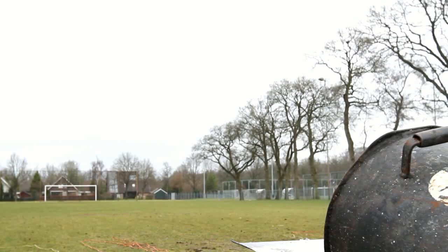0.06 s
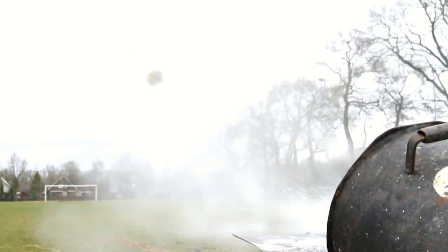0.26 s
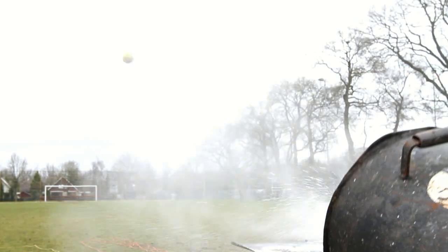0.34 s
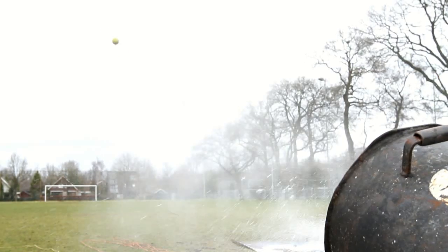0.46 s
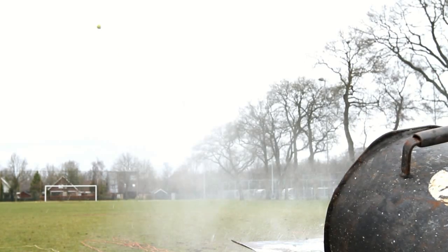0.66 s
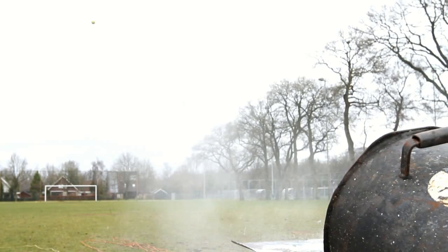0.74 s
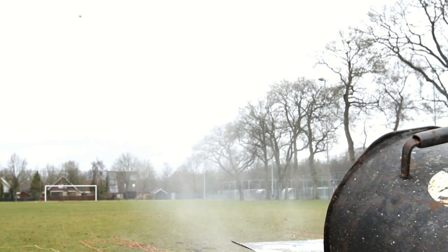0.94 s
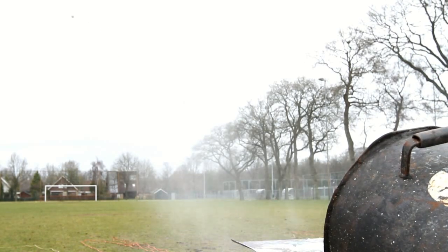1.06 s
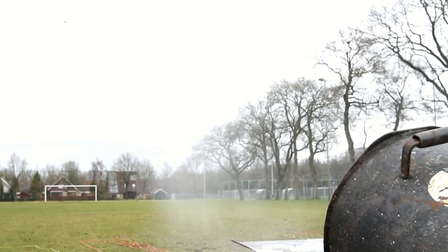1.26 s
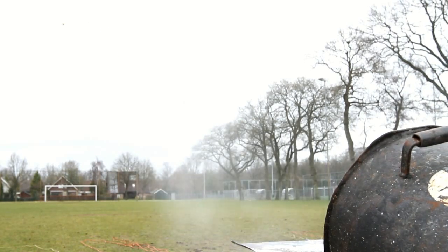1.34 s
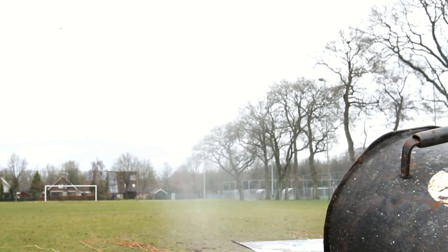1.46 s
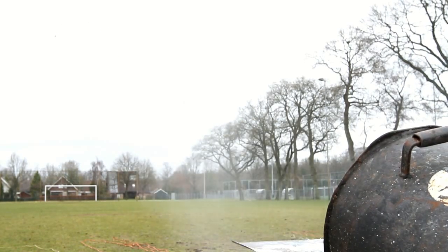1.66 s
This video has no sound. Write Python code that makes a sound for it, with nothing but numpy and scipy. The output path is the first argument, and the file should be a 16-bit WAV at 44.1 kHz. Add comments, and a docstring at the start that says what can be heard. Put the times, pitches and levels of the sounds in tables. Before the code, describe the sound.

A carbide cannon fires close by at about 0.2 seconds, breaking the quiet of an open field with a sharp, overloaded crack and a deep boom. Quick reflections slap back from trees between 0.4 and 0.9 seconds as the shot spreads into a rolling rumble that grows duller. At about 1.4 seconds one clear, quieter echo returns from distant houses, and the faint rumble keeps fading.

```python
"""Carbide cannon on an open field

The crack of the muzzle blast overloads the recorder, and the boom of the barrel swells just behind it.
Trees scatter both into a long roll, while single trunks and fences reflect a few distinct slaps.
Over a second later, distant house fronts return one clear echo."""
import sys
import numpy as np
from scipy import signal
from scipy.fft import rfft, irfft
from scipy.io import wavfile

SR = 44100
rng = np.random.default_rng(int(sys.argv[2]) if len(sys.argv) > 2 else 0)


def dump_mix(stems):
    """Bounce the given channels to the path in sys.argv[1] as a 16-bit WAV at rate SR."""
    frames = np.atleast_2d(stems).T  # one column per channel
    limited = np.clip(frames, -1, 1)  # hard clip at full scale
    pcm = np.round(limited * 32767).astype(np.int16)
    wavfile.write(sys.argv[1], SR, pcm)


N = 74970
FIRE_S, BLAST_RISE_S = 0.2268, 0.004

# octave bands of the muzzle blast (frequency [Hz], level [dB], T60 [s])
CRACK_BANDS = [(31, -39, 0.24), (63, -41, 0.2), (125, -32, 0.1), (250, -21.5, 0.1), (516, -7, 0.1),
               (986, 3.5, 0.07), (2050, 6.5, 0.066), (4020, 8, 0.05), (7800, 2.5, 0.05),
               (15100, -14.5, 0.05)]
def crack(hold_s=0.009):
    """Blast wave: gas expanding suddenly from the muzzle radiates a brief broadband burst."""
    gas = noise(coherence=0.15)
    bands = sum(undb(db) * octave(gas, hz) * fade(FIRE_S + hold_s, t60) for hz, db, t60 in CRACK_BANDS)
    return rise(FIRE_S, BLAST_RISE_S) * bands


# octave bands of the outflow (frequency [Hz], level [dB], peak after the shot [s], half width [s])
BOOM_BANDS = [(31, -39.5, 0.045, 0.025), (63, -26, 0.045, 0.014), (119.6, -11, 0.064, 0.012),
              (250, -17, 0.035, 0.024), (470, -10, 0.028, 0.015)]
def boom():
    """Volume source: the barrel empties in one swell, whose pitch sinks as the lows peak later."""
    gas, age, out = noise(coherence=0.25), since(FIRE_S), 0
    for hz, db, peak_s, width_s in BOOM_BANDS:
        swell = np.exp(-0.5 * ((age - peak_s) / width_s) ** 2) * rise(FIRE_S, BLAST_RISE_S)
        band = octave(gas, hz) * swell
        out += undb(db) * band * np.sqrt(np.mean(swell ** 2) / np.mean(band ** 2))
    return out


# modes of the air in the barrel (frequency [Hz], level [dB], T60 [s])
BARREL_MODES = [(104.6, -15.5, 0.3), (144.7, -16.5, 0.27), (278, -24.5, 0.2), (352.3, -16, 0.25),
                (371.8, -20.5, 0.56)]
def barrel(swell_s=0.05):
    """Air-column resonance: damped modes build up with the boom and die quickly."""
    modes = 0
    for hz, db, t60 in BARREL_MODES:
        cycles = hz * since(FIRE_S) + rng.random()
        modes += undb(db) * np.sin(2 * np.pi * cycles) * fade(FIRE_S + swell_s, t60)
    return rise(FIRE_S, swell_s) ** 2 * modes


# octave bands of the scatter from nearby ground and trees (frequency [Hz], level [dB], T60 [s])
TREE_BANDS = [(31, -61, 0.6), (61.6, -44, 0.67), (132, -22.5, 0.9), (269.7, -12, 0.67), (500, -14.5, 0.75),
              (1050, -9.5, 0.48), (2010, -9.5, 0.39), (4300, -8, 0.3), (7650, -17.5, 0.3),
              (15000, -29, 0.3)]
def trees(rise_s=0.033):
    """Multiple scattering: trunks and branches spread the shot into a roll that dulls as it fades."""
    arrivals = noise(coherence=0.1, grain_db=2)
    bands = sum(undb(db) * octave(arrivals, hz) * fade(FIRE_S, t60) for hz, db, t60 in TREE_BANDS)
    return rise(FIRE_S, rise_s) * bands


# reflections from trunks and fences (time [s], level [dB], left minus right [dB])
SLAP_ARRIVALS = [(0.3998, -23, 25), (0.4035, -21, 45.5), (0.4265, -7, -15.5), (0.456, -10, -19),
                 (0.463, -11, -13), (0.522, -15.5, -7), (0.527, -6.5, 5), (0.676, -20.5, 1),
                 (0.88, -25.5, 0), (0.92, -28.5, -14)]
# spectrum of a slap (frequency [Hz], relative level [dB])
SLAP_SPECTRUM = [(30, -23), (70, -11), (150, 7.5), (400, 1), (1000, -6.5), (4000, -19.5), (8000, -25),
                 (15000, -67)]
def slaps(cutoff_hz=3000, dulling_s=1):
    """Early reflections: single surfaces return the shot, and air absorption dulls the later ones."""
    bright = reflections(SLAP_ARRIVALS, SLAP_SPECTRUM, scatter_db=-0.5, t60=0.057, coherence=0.3)
    dull = signal.filtfilt(*signal.butter(1, cutoff_hz, fs=SR), bright)
    return bright + rise(FIRE_S, dulling_s) * (dull - bright)


# reflections from distant house fronts (time [s], level [dB], left minus right [dB])
ECHO_ARRIVALS = [(1.3583, -13, 3), (1.4047, -32, 7), (1.4298, -35.5, 1)]
# spectrum of an echo, its treble absorbed by the air (frequency [Hz], relative level [dB])
ECHO_SPECTRUM = [(30, -19), (65, -3), (140, 13.5), (280, 4.5), (500, 8.5), (800, -1), (1300, 5),
                 (2200, 5.5), (4000, -10), (6600, -30.5), (11000, -54.5)]
def house_echoes():
    """Specular reflection: flat house fronts return one strong echo and two faint ones."""
    return reflections(ECHO_ARRIVALS, ECHO_SPECTRUM, scatter_db=-2.5, t60=0.035, coherence=0.88)


def echo_ring(hz=460, width_hz=260, db=-36, rise_s=0.014, t60=0.11):
    """Damped resonance: a hollow band of noise hangs on briefly after the strongest echo."""
    start = ECHO_ARRIVALS[0][0]
    tone = resonance(resonance(noise(coherence=1), hz, width_hz), hz, width_hz)
    return undb(db) * tone / tone.std() * rise(start, rise_s) * fade(start, t60)


# returns from groves (time [s], relative level [dB], T60 [s], left minus right [dB], coherence [0-1])
GROVE_ARRIVALS = [(0.387, -0.5, 1, 0, 0.24), (0.507, -4.5, 0.23, 0, 1), (0.599, -9.5, 1.0, 2, 0.56),
                  (0.975, -21, 0.62, -9, 0.24), (1.21, -23.5, 0.33, -3, 0.5), (1.284, -18, 0.27, -2, 0.94)]
# octave bands of those returns (frequency [Hz], relative level [dB], loss [dB/s])
GROVE_BANDS = [(30.54, -69.5, 0), (62.9, -41, 54), (134, -25.5, 4), (265, -25, 5.5), (513, -25.5, 9.5),
               (1015, -27.5, 12.5), (2025, -30, 9.5), (3880, -28, 18), (7410, -33.5, 52), (15600, -49, 56)]
def groves(gain_db=-13.5, rise_s=0.031):
    """Backscatter: each stand of trees returns a broad swell, duller the longer its path."""
    arrivals = 0
    for start, db, t60, pan_db, coherence in GROVE_ARRIVALS:
        swell = rise(start, rise_s) * fade(start + rise_s, t60)
        arrivals += undb(db) * pan(pan_db) * noise(coherence, grain_db=2) * swell
    travel_s = since(GROVE_ARRIVALS[0][0])
    bands = sum(undb(db - loss * travel_s) * octave(arrivals, hz) for hz, db, loss in GROVE_BANDS)
    return undb(gain_db) * bands


# octave bands of the scatter from the field's far edge (frequency [Hz], level [dB], loss [dB/s])
FAR_BANDS = [(31.83, -82, 5), (63, -62.5, 7.5), (125, -53.5, 1.5), (250, -50, 4.5), (500, -52.5, 0.5),
             (980, -52, 3), (2060, -48.5, 7), (3721, -48, 13), (8000, -62, 17.5), (15000, -92.5, 10.5)]
def far_edge(rise_s=0.36, fade_from_s=1.417, t60=3.5):
    """Reverberation: a rumble holds and dulls while the wave sweeps the field's rim, then fades."""
    arrivals = noise(coherence=0.53, grain_db=2)
    bands = sum(undb(db - loss * since(FIRE_S)) * octave(arrivals, hz) for hz, db, loss in FAR_BANDS)
    return rise(FIRE_S, rise_s) * fade(fade_from_s, t60) * bands


def ignition(start=0.182, db=-49.5, rise_s=0.0029, t60=0.15):
    """Combustion noise: the gas catches with a faint puff just before the shot."""
    spectrum = [(40, -9.5), (300, -4), (1200, -12.5), (4000, -43), (15000, -60)]
    puff = colour(noise(coherence=0.44), spectrum)
    return undb(db) * puff / puff.std() * rise(start, rise_s) * fade(start, t60)


# octave bands of quiet open air (frequency [Hz], level [dB])
AIR_BANDS = [(31, -87), (63, -74.5), (125, -73.5), (250, -72), (500, -71.5), (1000, -75), (2000, -77),
             (4000, -76.5), (8000, -77), (15000, -80.5)]
def air():
    """Ambient noise: the faint, steady background is almost incoherent between left and right."""
    ambient = noise(coherence=0.051)
    return sum(undb(db) * octave(ambient, hz) for hz, db in AIR_BANDS)


def reflections(arrivals, spectrum, scatter_db, t60, coherence):
    """Specular and diffuse reflection: each surface returns a sharp pulse and a short trail."""
    out = np.zeros((2, N))
    for start, db, pan_db in arrivals:
        response = noise(coherence) * (since(start) > 0) * fade(start, t60)
        response *= undb(scatter_db) / np.sqrt(np.sum(response ** 2) / 2)
        response[:, int(start * SR)] += pan(pan_db)[:, 0]  # the specular pulse
        out += undb(db) * response
    return colour(out, spectrum)


def noise(coherence, grain_db=0):
    """Random superposition: countless small arrivals form stereo noise; grain makes them uneven."""
    mid, side = rng.standard_normal((2, N))
    sizes = undb(grain_db * np.repeat(rng.standard_normal(N // 16 + 1), 16)[:N])
    stereo = np.sqrt(1 + coherence) * mid + np.sqrt(1 - coherence) * np.array([side, -side])
    return sizes * stereo / np.sqrt(2)


def octave(x, hz):
    """Band filtering: one octave with soft skirts, at rms 1."""
    octaves_away = np.log2(np.maximum(np.fft.rfftfreq(N, 1 / SR), 1) / hz)
    band = irfft(rfft(x) * np.cos(np.pi / 2 * np.clip(octaves_away, -1, 1)) ** 2, N)
    return band / np.sqrt(np.mean(band ** 2))


def colour(x, spectrum, size=4096):
    """Minimum-phase filtering through (frequency [Hz], level [dB]); a unit impulse peaks at 1."""
    hz, db = np.array(spectrum).T
    gain_db = np.interp(np.log(np.fft.rfftfreq(size, 1 / SR) + 1), np.log(hz), db)
    cepstrum = irfft(np.log(undb(gain_db)))
    cepstrum[1:size // 2] *= 2  # folding the cepstrum makes the filter causal
    cepstrum[size // 2 + 1:] = 0
    response = irfft(np.exp(rfft(cepstrum)))
    return signal.fftconvolve(x, response[None] / np.abs(response).max())[:, :N]


def resonance(x, hz, width_hz):
    """Second-order resonator with gain 1 at its centre."""
    return signal.lfilter(*signal.iirpeak(hz, hz / width_hz, fs=SR), x)


def undb(db):
    """Amplitude ratio of a level in decibels."""
    return 10 ** (np.asarray(db) / 20)


def pan(db):
    """Left and right gains for a level difference."""
    return undb(np.array([[db], [-db]]) / 2)


def since(start):
    """Seconds since a moment, zero before it."""
    return np.maximum(np.arange(N) / SR - start, 0)


def rise(start, length_s):
    """Linear onset from silence to full level."""
    return np.minimum(since(start) / length_s, 1)


def fade(start, t60):
    """Exponential decay: full level until the start, then 60 dB down every t60 seconds."""
    return np.exp(-np.log(1000) * since(start) / t60)


def scene(near_pan_db=-3, left_lag_s=0.00007):
    """Superposition: the shot and its returns add, with the barrel and near trees to the right."""
    echoes = house_echoes()
    near = (boom() + barrel() + trees()) * pan(near_pan_db)
    left, right = ignition() + near + groves() + slaps() + far_edge()
    lagged = np.array([np.roll(left, int(left_lag_s * SR)), right])
    return lagged + crack() + echoes + echo_ring() + air()


def record(dry, presence_db=-12.5, knee=8, top_hz=15700):
    """Saturation: the microphone lifts the treble; the recorder flattens peaks and cuts the top."""
    bright = dry + undb(presence_db) * resonance(dry, hz=6265, width_hz=990)
    clipped = bright / (3.5 + np.abs(bright) ** knee) ** (1 / knee)
    return signal.sosfilt(signal.ellip(8, 0.2, 70, top_hz, fs=SR, output="sos"), clipped)


dry = scene()
out = record(dry)
dump_mix(out)
```